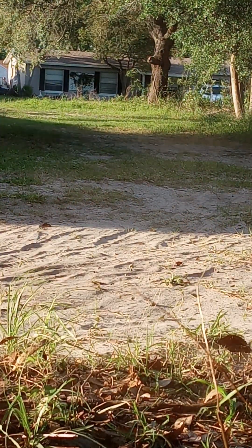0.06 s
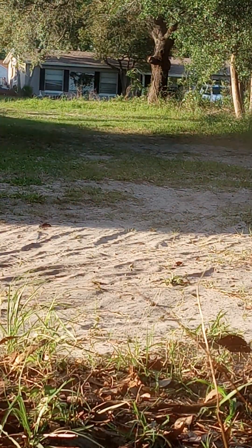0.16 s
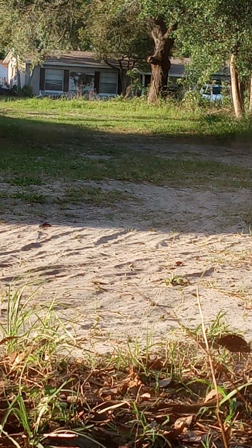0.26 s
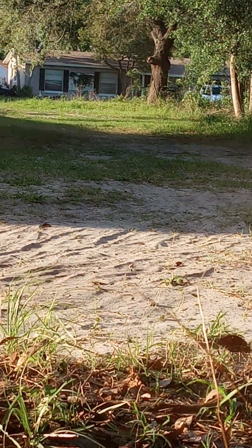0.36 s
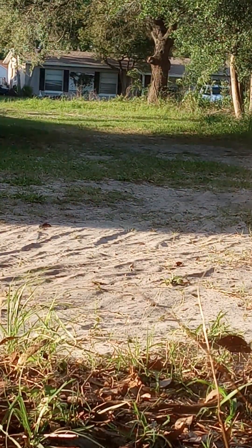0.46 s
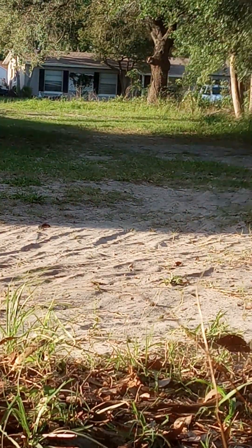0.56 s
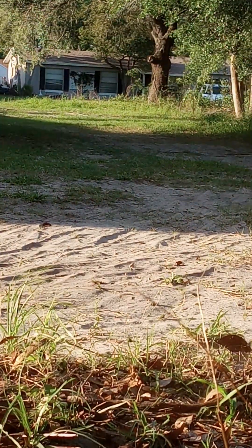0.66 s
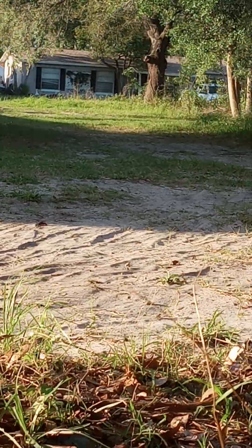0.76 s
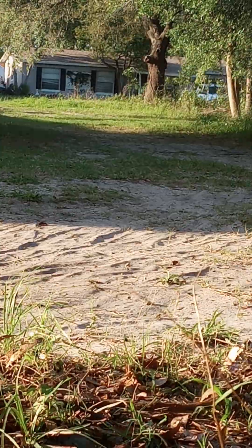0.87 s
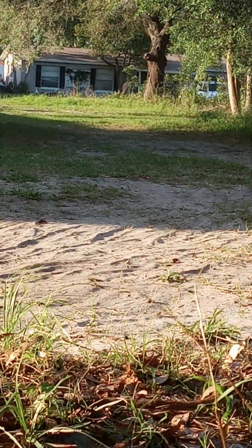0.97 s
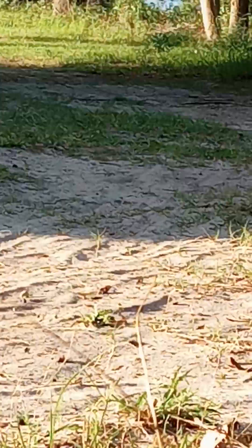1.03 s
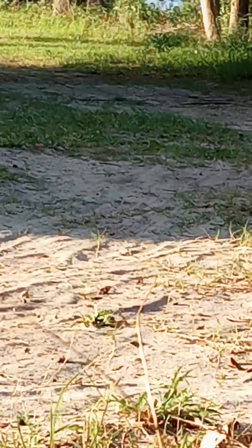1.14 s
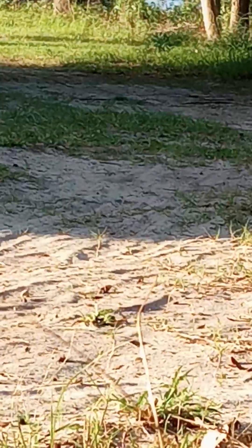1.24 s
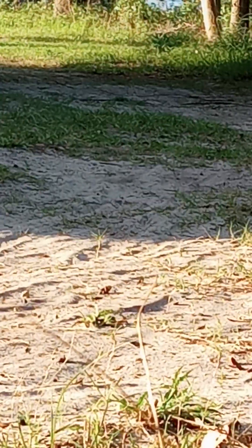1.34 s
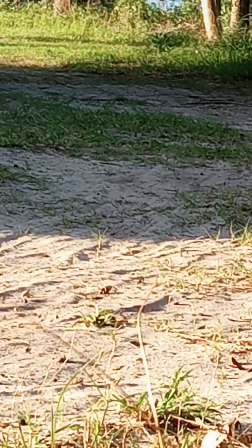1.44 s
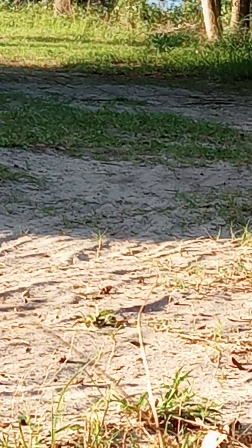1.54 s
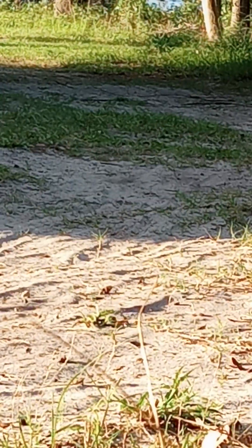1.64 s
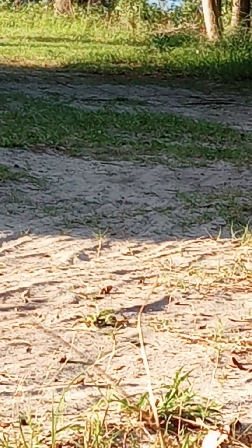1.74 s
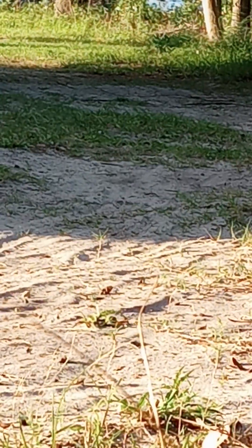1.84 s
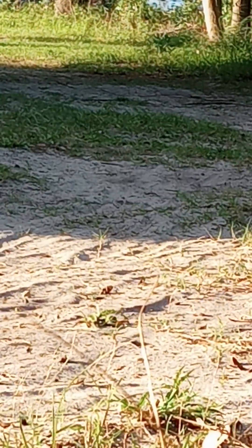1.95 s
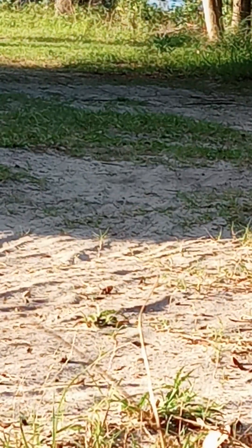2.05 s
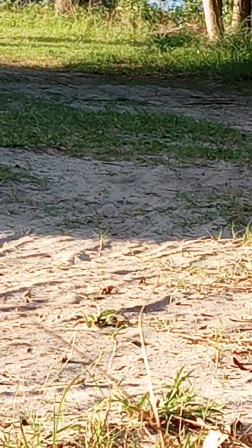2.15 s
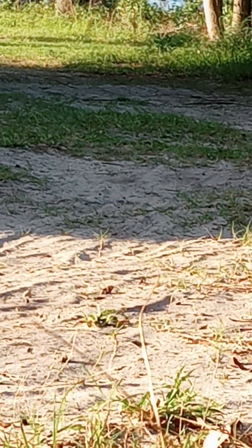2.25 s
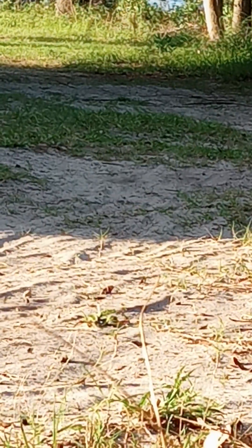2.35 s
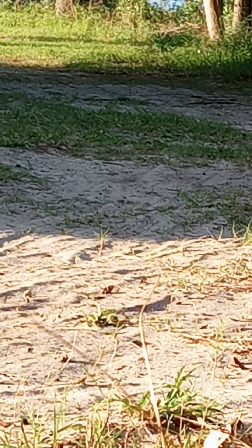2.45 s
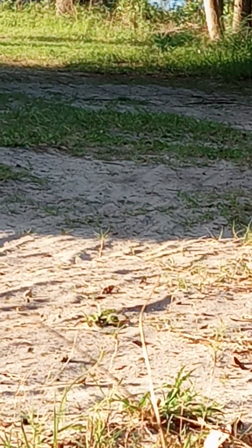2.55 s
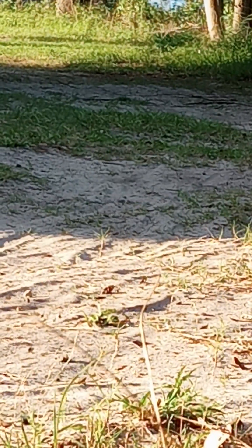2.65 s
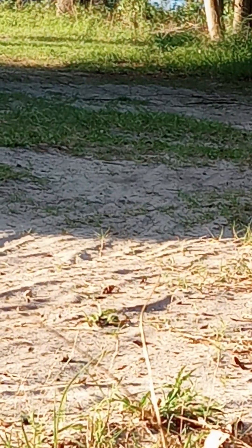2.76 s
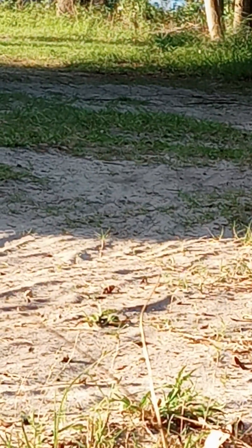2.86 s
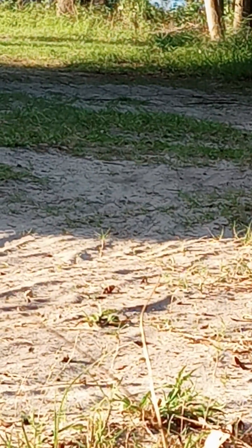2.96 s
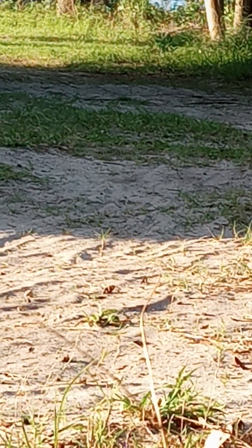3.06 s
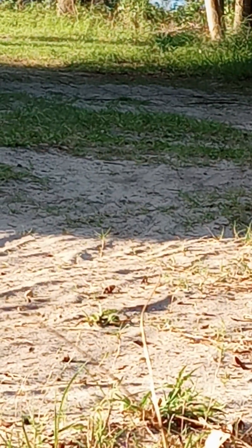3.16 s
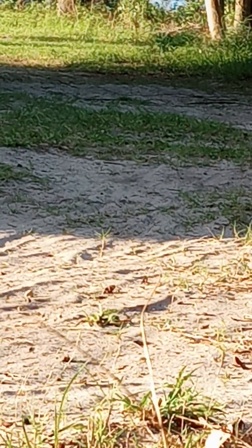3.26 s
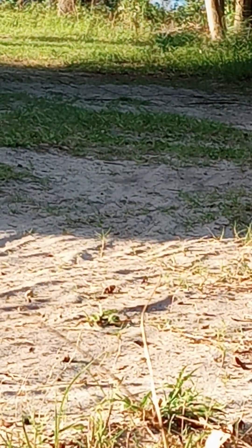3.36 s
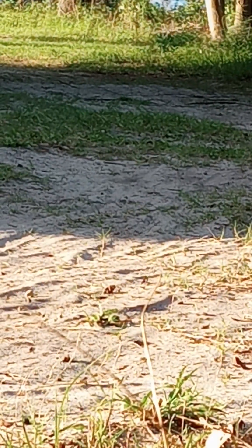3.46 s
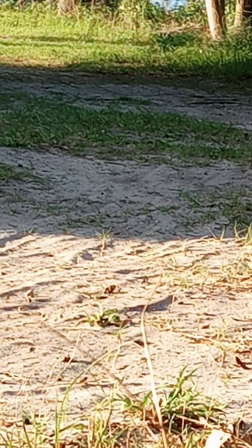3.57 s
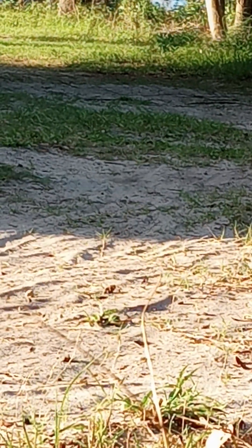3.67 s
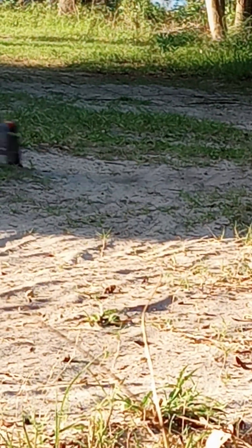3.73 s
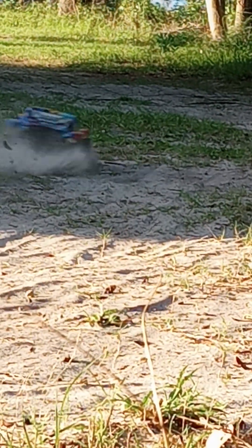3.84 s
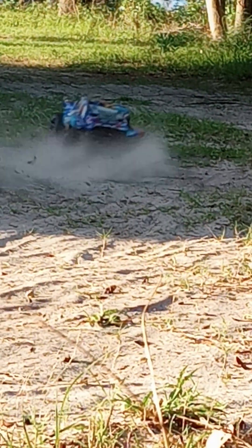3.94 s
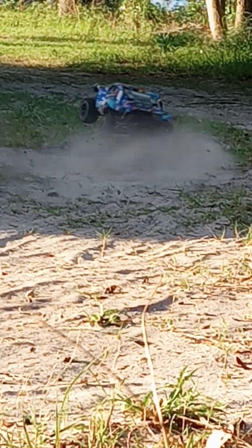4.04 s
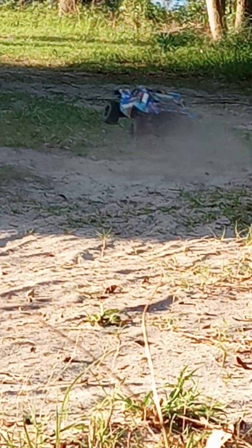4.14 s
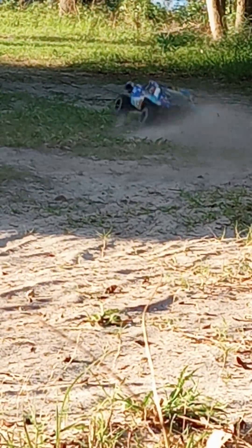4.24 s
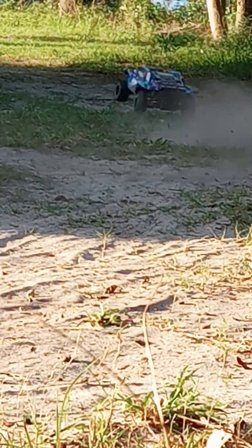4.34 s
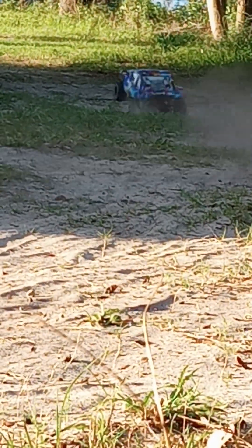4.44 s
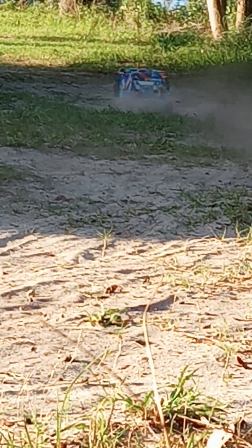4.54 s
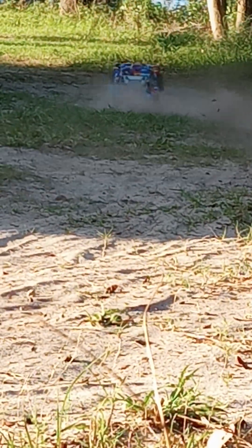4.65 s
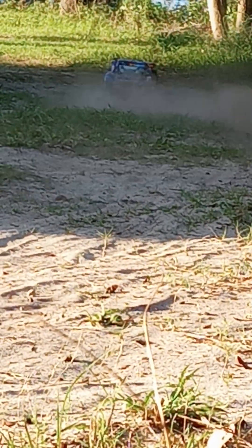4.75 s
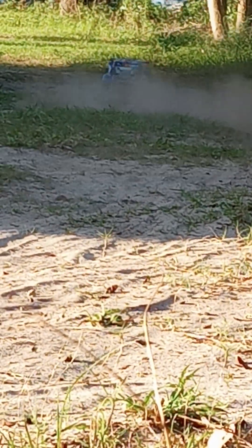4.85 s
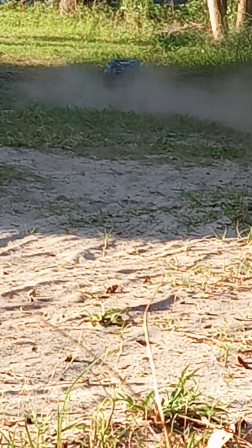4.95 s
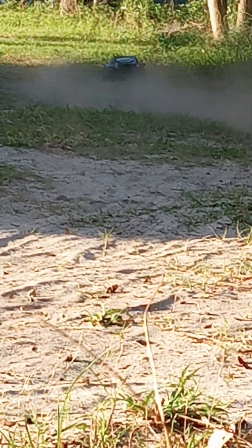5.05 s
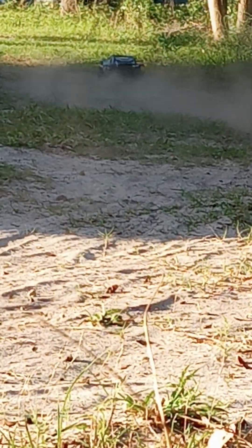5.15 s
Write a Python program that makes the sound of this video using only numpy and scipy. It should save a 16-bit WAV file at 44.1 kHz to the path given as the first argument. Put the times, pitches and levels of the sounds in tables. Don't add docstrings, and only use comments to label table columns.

```python
import sys
import numpy as np
from scipy import signal
from scipy.fft import rfft, irfft
from scipy.io import wavfile
from scipy.ndimage import uniform_filter1d, map_coordinates

SR = 44100
rng = np.random.default_rng(int(sys.argv[2]) if len(sys.argv) > 2 else 0)


def to_wav(s):
    ch = np.atleast_2d(s).T
    pcm = np.round(np.clip(ch, -1, 1) * 32767)
    wavfile.write(sys.argv[1], SR, pcm.astype(np.int16))


def decibels_to_gain(level_db):
    exponent = np.asarray(level_db, float) / 20
    return 10 ** exponent


N = 229408
TIME = np.arange(N) / SR
SIDES = np.array([[.5], [-.5]])
TOP_HZ = 15600
AXLE_RATIO = .395
# [t/s, f/Hz]
FIRST_NOTCH = [(1.45, 3000), (2.1, 2950), (2.4, 2680), (2.75, 2820), (3.25, 2560), (3.55, 3150),
               (3.95, 3050), (4.25, 3050), (4.33, 3400), (4.7, 3550), (4.8, 2800), (4.9, 3200),
               (5.2, 3500)]


def in_time(rows):
    s, *columns = np.transpose(rows)
    return [np.interp(TIME, s, c) for c in columns]


def at_hz(points, hz):
    point_hz, value = np.array(points).T
    return np.interp(np.log(hz), np.log(point_hz), value)


def rms_one(x):
    return x / np.sqrt(np.mean(x ** 2) + 1e-20)


def drift(rate):
    r = np.exp(-64 * np.pi * rate / SR)
    noise = rng.standard_normal(N // 32 + 1002)
    slow = signal.lfilter([1], [1, -2 * r, r * r], noise)[1000:]
    return np.interp(np.arange(N) / 32, np.arange(len(slow)), rms_one(slow))


def resonance(x, hz, width):
    r = np.exp(-np.pi * width / SR)
    zeros = np.array([1, 0, -1]) * (1 - r * r) / 2
    return signal.lfilter(zeros, [1, -2 * r * np.cos(2 * np.pi * hz / SR), r * r], x)


def steep(x, hz, width):
    return resonance(resonance(x, hz, width), hz, width)


def ringing(x, modes, patchy_db):
    out = 0
    for hz, width, db in modes:
        swell_db = patchy_db * np.clip(drift(24.8), -2, 2)
        out = out + decibels_to_gain(db + swell_db) * steep(x, hz, 0.8 * width)
    return out


def treble_share(hz):
    return np.clip(np.log2(hz / 4500) / 1.94, 0, 1)


def grains(per_s, spread_db):
    size_db = spread_db * np.minimum(rng.exponential(1, (2, 2, N)), 4)
    sizes = decibels_to_gain(size_db) * rng.standard_normal((2, 2, N))
    return sizes * (rng.random((2, 1, N)) < per_s / SR) + 1e-9


def banded(source, spectrum, patchy_db, treble_db=0, pan_db=0, order=2):
    # [f/Hz, share 0-1]
    likeness = [(25, .62), (120, .97), (500, .9), (1200, .62), (2500, .87), (5000, .52), (9000, .5),
                (15000, .4)]
    lowest, highest = spectrum[0][0], spectrum[-1][0]
    edges = np.geomspace(lowest, highest, round(2 * np.log2(highest / lowest)) + 1)
    out, power, together = 0, 0, drift(8.3)
    for k, (low, high) in enumerate(zip(edges, edges[1:])):
        band = signal.butter(order, [low, high], "band", fs=SR, output="sos")
        mid, side = signal.sosfilt(band, source[k % 2])
        hz = np.sqrt(low * high)
        alike = np.clip(at_hz(likeness, hz), 0, 1)
        gain = decibels_to_gain(at_hz(spectrum, hz))
        power += np.mean(mid ** 2) * gain ** 2
        flicker_db = patchy_db * (together + drift(17.0))
        moving = decibels_to_gain(flicker_db + treble_share(hz) * (treble_db + pan_db * SIDES))
        stereo = np.sqrt(1 + alike) * mid + np.sqrt(1 - alike) * side * 2 * SIDES
        out = out + gain * moving * stereo
    return out / np.sqrt(2 * power)


def stretches(rows, rise, fall):
    start, length, *levels = np.transpose(rows)[:, :, None]
    t = TIME[::32]
    shape = -rise * np.clip(start - t, 0, None) - fall * np.clip(t - start - length, 0, None)
    curves = []
    for db in levels:
        power = np.sum(10 ** ((db + shape) / 10), axis=0)
        curves.append(np.interp(TIME, t, 10 * np.log10(power + 1e-20)))
    return curves


def gaps(rows, edge):
    return sum(np.clip(-edge * np.minimum(TIME - start, end - TIME), depth_db, 0)
               for start, end, depth_db in rows)


def ticks(events, decay_s, pan_db, broad):
    out, t = np.zeros((2, N + 900)), np.arange(900) / SR
    noises = rng.standard_normal((len(events), 2, len(t)))
    for (s, peak_db, hz), noise in zip(events, noises):
        crack = (noise[0] + 2.7 * noise) * np.exp(-t / decay_s)
        crack[:, 0] = -4.0
        crack = steep(crack, hz, broad * hz) + 2.5 * resonance(crack, hz, .15 * hz)
        at = round(s * SR)
        out[:, at:at + len(t)] += decibels_to_gain(peak_db + pan_db * SIDES) * crack / np.abs(crack).max()
    return out[:, :N]


def yard():
    # [f/Hz, level/dB per Hz]
    yard_spectrum = [(15, -45), (25, -24), (99, 3), (156, -1.5), (400, -14), (1000, -16.5), (3740, -31.5),
                     (5610, -32), (8170, -50), (15600, -37)]
    # [start t/s, length/s, level/dB]
    swells = [(0, 1.04, -62.5), (1.4, 4.7, -67), (.38, 0.073, -60), (.74, 0.046, -58), (1.65, 0.037, -67.5),
              (2.2, 0.059, -66), (2.63, 0.033, -63), (3.12, 0.035, -58.5), (3.7, 0.07, -76),
              (4.5, 0.039, -69), (4.86, 0.41, -60)]
    # (f/Hz, width/Hz, level/dB over the traffic)
    idle_hz, idle_width_hz, idle_db = (119.8, 17.6, 2)
    air = banded(rng.standard_normal((2, 2, N)), yard_spectrum, patchy_db=1.2) * decibels_to_gain(-2.2 * SIDES)
    low = signal.sosfilt(signal.butter(2, 260, fs=SR, output="sos"), air)
    engine = decibels_to_gain(idle_db) * steep(low, idle_hz, idle_width_hz)
    traffic_db = stretches(swells, rise=75, fall=84)[0] + 2.0 * drift(9)
    return decibels_to_gain(traffic_db) * (low + engine) + decibels_to_gain(-67.0) * (air - low)


def leaves():
    # [f/Hz, level/dB per Hz]
    leaf_spectrum = [(880, -48), (1500, -5.5), (2500, -17), (3300, 4.5), (5000, 1.5), (7000, 1.5),
                     (8500, -17.5), (15600, -9)]
    # [start t/s, length/s, level/dB]
    stirs = [
        (.008, 0.042, -60.5),
        (.022, 0.019, -60),
        (.06, 0.051, -54),
        (.124, .012, -60),
        (.14, 0.049, -50),
        (0.247, 0.04, -69.5),
        (0.34, 0.083, -74.5),
        (0.12, 1, -81.5),
        (0.704, 0.039, -74),
    ]
    # [t/s, peak level/dB, f/Hz]
    leaf_snaps = [(0.013, -47, 5200), (0.0244, -57, 10350), (0.0305, -42, 4500), (0.037, -49, 6980),
                  (0.0598, -33, 3900), (0.1008, -33.5, 3840), (0.1385, -30.5, 6200), (0.1412, -35, 5900),
                  (0.1552, -47.5, 4900), (0.179, -40, 5200), (0.2034, -50, 4730), (0.262, -52, 6010),
                  (0.2764, -58, 6040), (0.3444, -56, 6820), (0.3563, -56, 4750), (0.3674, -69, 4300),
                  (0.58, -51, 10600), (0.6235, -58, 5760), (0.739, -58.5, 3120), (1.0795, -54, 10900)]
    rustle = banded(grains(5300, spread_db=3.0), leaf_spectrum, patchy_db=2.0, pan_db=-33.0)
    snaps = .7 * ticks(leaf_snaps, decay_s=.0018, pan_db=-8.0, broad=2.5)
    return decibels_to_gain(stretches(stirs, rise=730, fall=1500)[0] - 9.0) * rustle + snaps


def twig():
    # [t/s, peak level/dB, f/Hz]
    twig_snap = [
        (0.0594, -35, 890),
    ]
    return ticks(twig_snap, decay_s=.0003, pan_db=-2.0, broad=.35)


def motor_hz():
    # [t/s, mesh f/Hz]
    pulls = [
        [(1.572, 2150), (1.6, 3100), (1.625, 3600), (1.65, 3420), (1.68, 3000), (1.744, 2750), (1.798, 2063)],
        [(1.836, 2485), (1.878, 3400), (1.95, 3520)],
        [(2.06, 1842), (2.098, 2650), (2.13, 2520), (2.182, 2800), (2.2, 2620), (2.232, 2560), (2.258, 2700),
         (2.28, 3060), (2.31, 3170)],
        [(2.338, 3050), (2.36, 3250), (2.44, 4600), (2.472, 4720), (2.51, 4050), (2.54, 4370), (2.59, 4340)],
        [(2.632, 3070), (2.71, 5100), (2.748, 5500), (2.8, 4850), (2.9, 3669), (2.958, 4760), (2.988, 4740),
         (3.005, 4280), (3.04, 3980)],
        [(3.075, 3920), (3.1, 4200), (3.14, 4500), (3.168, 5020), (3.19, 5150), (3.215, 4850), (3.25, 3950)],
        [(3.57, 3424), (3.636, 5426), (3.655, 5913), (3.72, 4252), (3.775, 6020), (3.92, 5937)],
        [(3.97, 3434), (4.11, 3674), (4.125, 4850), (4.17, 5650), (4.215, 6200), (4.32, 6358)],
        [(4.378, 2900), (4.41, 4950), (4.455, 6826), (4.5, 7700), (4.55, 8130), (4.605, 8610), (4.64, 7950),
         (4.676, 5340), (4.75, 4870)],
        [(4.82, 3625), (4.87, 5100), (4.92, 7190), (4.945, 7720), (4.98, 7750), (5.03, 7520)],
    ]
    return uniform_filter1d(in_time(np.concatenate(pulls))[0], size=900)


def drive_levels(hz):
    # [start t/s, length/s, rattle level/dB, whine over rattle/dB]
    load = [(1.477, 0.071, -58, -19), (1.574, 0.07, -48, -12), (1.655, 0.067, -46.5, -18),
            (1.733, 0.13, -46.5, -40), (1.822, 0.098, -45.5, -16), (1.96, 0.077, -54, -20),
            (2.073, 0.052, -52, -7), (2.075, 0.27, -45.5, -15.5), (2.37, 0.11, -43, -3),
            (2.501, 0.11, -37, -20.5), (2.65, 0.18, -35.5, -12), (2.838, 0.23, -35, -11),
            (3.096, 0.13, -35.5, -9), (3.282, 0.02, -44, -38), (3.384, 0.19, -56, -43),
            (3.542, 0.027, -47.5, -27), (3.589, 0.078, -42, -8.5), (3.67, 0.089, -47.5, -39),
            (3.784, 0.072, -39.5, -20), (3.88, 0.061, -45, -27), (4.015, 0.15, -43.5, -15.5),
            (4.158, 0.047, -43, -4), (4.21, 0.072, -57, -5), (4.301, 0.068, -45, -9),
            (4.412, 0.072, -43.5, -6), (4.501, 0.098, -45.5, -9), (4.617, .035, -48, -17),
            (4.644, 0.053, -48.5, -15), (4.718, 0.1, -49.5, -11.5), (4.861, 0.053, -51, -1.5),
            (4.919, 0.062, -49.5, -11), (5.012, 0.062, -60.5, -35), (5.171, 0.032, -56, -27)]
    rise = 386
    rattle_db, = stretches([row[:3] for row in load], rise, fall=266)
    gear_rows = [(s, length, db + over) for s, length, db, over in load]
    gears_db, = stretches(gear_rows, rise, fall=380)
    judder_db = 0.5 * drift(41)
    octaves_per_s = uniform_filter1d(np.gradient(np.log2(hz)) * SR, size=600)
    return rattle_db + judder_db, gears_db + judder_db, np.tanh(octaves_per_s / 11.0)


def whine(hz, axle_db, mesh_db, second_db, pan_db):
    # [t/s, share of noise band 0-1]
    wheelspin = [(1.5, .5), (1.7, .55), (2.0, .7), (2.1, .3), (2.85, .3), (3.25, .33), (3.55, .7),
                 (3.7, .9), (4.26, .88), (4.45, .75), (4.6, .65), (4.7, .9), (4.83, .75), (4.9, .9),
                 (5.1, .75)]
    # [t/s, phase/rad per turn]
    out_of_true = [
        (1.5, .2),
        (2.75, .15),
        (2.95, .5),
        (3.25, .6),
        (5.1, .3),
    ]
    pinion_teeth, spur_teeth = 26, 54.0
    third_db, breakup_db = -11.5, 9.0
    front_ratio, front_db, front_start_hz, front_fade_hz = .83, -2.5, 3250, 3900
    slip = 1 + .013 * drift(24)
    cycles = np.cumsum(hz * slip) / SR
    spur_turn = 2 * np.pi * cycles / spur_teeth
    throb = 1 + .5 * np.sin(2 * np.pi * cycles / pinion_teeth + drift(30))
    throb *= 1 + .4 * np.sin(spur_turn + drift(8))
    loose, out = in_time(wheelspin)[0], 0
    wobble = in_time(out_of_true)[0] * np.sin(spur_turn)
    coasting_db = np.clip(-np.gradient(hz) * SR / 500, 0, 15)
    front_loss_db = 10 * np.log10(1 + (hz / front_fade_hz) ** 8 + (front_start_hz / hz) ** 20)
    gear_lines = [(AXLE_RATIO, axle_db), (1, mesh_db), (2, second_db), (3, second_db + third_db),
                  (front_ratio, mesh_db + front_db - front_loss_db - coasting_db)]
    for multiple, level_db in gear_lines:
        spin = loose * min(multiple, 1) ** (3 - 3 * loose)
        smear = .6 * np.sqrt(multiple) * drift(80) + (multiple ** 2 - .75) * wobble
        phase = 2 * np.pi * multiple * cycles + smear + .7 * SIDES * drift(40)
        low_pass = signal.butter(2, 360 * multiple ** .6, fs=SR, output="sos")
        wide = signal.sosfilt(low_pass, rng.standard_normal((2, N)))
        a, b = spin * rms_one(wide) / np.sqrt(2)
        clean = np.sqrt(1 - spin ** 2) * throb * decibels_to_gain(1.8 * drift(40))
        audible = np.clip((TOP_HZ - multiple * hz) / 300, 0, 1)
        grip_loss = spin ** (3 / max(multiple, 1) ** 1.1)
        broken_db = breakup_db * grip_loss * np.clip(drift(34), -3, 1)
        side_db = treble_share(multiple * hz) * pan_db * SIDES
        level = 0.99 * audible * decibels_to_gain(level_db + broken_db + side_db)
        out = out + level * ((clean + a) * np.sin(phase) + b * np.cos(phase))
    return out


def gearbox(rattle_db, treble_db, pan_db):
    # [f/Hz, level/dB per Hz]
    rattle_spectrum = [(1100, 6.5), (1500, -22), (2300, 1), (3000, 10), (4200, 0.5), (6400, 0),
                       (8500, -0.5), (11000, -13), (13500, -4.5), (15800, -10)]
    # [f/Hz, width/Hz, level/dB over the rattle]
    chassis = [(2210, 90, 2), (3050, 130, 0), (3650, 130, 2), (4450, 140, 1), (5900, 240, 2),
               (6650, 170, 2), (7800, 180, 1), (8800, 220, 3), (9500, 240, 2), (10300, 240, 1),
               (11200, 450, 0), (12500, 320, -1)]
    rattle = banded(grains(16000, spread_db=0.6), rattle_spectrum, patchy_db=1.5,
                    treble_db=treble_db + 5.0, pan_db=1.04 * pan_db)
    modes = ringing(rattle, chassis, patchy_db=6.5)
    swerve_s = TIME + .00015 * drift(5)
    modes = np.array([np.interp(swerve_s, TIME, c) for c in modes])
    return decibels_to_gain(rattle_db - 9.5) * (rattle + decibels_to_gain(0.5) * modes)


def with_late_copy(x):
    late = np.arange(N) - SR / 2 / in_time(FIRST_NOTCH)[0]
    dull = uniform_filter1d(x, size=5, axis=1)
    return x + .8 * np.array([map_coordinates(c, [late], order=1) for c in dull])


def tyres():
    # [start t/s, length/s, low thump level/dB, side panel level/dB]
    contact = [(1.506, 0.087, -77, -54.5), (1.46, 0.045, -73, -60), (1.62, 0.36, -63, -66),
               (1.88, 0.067, -56, -59.5), (2.05, 0.089, -65, -61.5), (2.17, 0.14, -68.5, -86),
               (2.3, 0.047, -67, -59.5), (2.4, 0.29, -58, -57.5), (2.72, 0.16, -56.5, -54),
               (2.88, 0.1, -63.5, -56.5), (2.99, 0.17, -53, -54), (3.2, 0.11, -52.5, -52),
               (3.35, 0.051, -52, -60), (3.41, 0.095, -55, -73), (3.56, .08, -90, -104),
               (3.68, 0.05, -54, -62), (3.77, 0.19, -60.5, -72.5), (4.02, 0.18, -63, -68),
               (4.32, 0.057, -52, -52.5), (4.42, 0.15, -68.5, -77), (4.63, 0.062, -46.5, -49),
               (4.71, 0.17, -61, -79), (4.99, 0.016, -48.5, -58), (5.04, 0.21, -71, -74)]
    # [f/Hz, width/Hz, level/dB]
    thump = [(328.3, 183, -4.5), (403, 74, -4), (478.6, 45, -2.5), (580, 58, -5.5)]
    # [f/Hz, width/Hz, level/dB]
    panel = [(697.6, 150, 11), (771, 127, 7.5)]
    # [f/Hz, width/Hz, level/dB]
    scrabble = [(888, 270, 9.5), (1265, 530, -4), (1228, 170, 1.5), (1690, 90, -4)]
    mid, side = grains(900, spread_db=-0.5)[0]
    blows = mid + 0.24 * side * 2 * SIDES
    thump_db, panel_db = stretches(contact, rise=590, fall=390)
    scrabble_db = (thump_db + panel_db) / 2 - 3.5
    out = 0
    for level_db, modes in ((thump_db, thump), (panel_db, panel), (scrabble_db, scrabble)):
        hz = modes[1][0]
        group = ringing(blows, modes, patchy_db=4.0) + 0.07 * resonance(blows, hz, 3.5 * hz)
        out = out + decibels_to_gain(level_db - 5.0) * rms_one(group)
    return out


def buzzes(pan_db):
    # [start t/s, length/s, f/Hz, level/dB]
    loose_parts = [(1.509, 0.037, 766, -59), (1.824, 0.017, 4480, -61.5), (1.851, 0.024, 4660, -63),
                   (2.012, 0.013, 723, -64.5), (1.828, 0.02, 2430, -57.5), (1.86, 0.027, 6640, -59),
                   (2.429, 0.062, 11400, -59), (2.542, 0.077, 10940, -52.5), (2.55, 0.051, 2160, -58),
                   (2.82, 0.042, 11150, -52.5), (2.835, 0.047, 6420, -50), (3.101, 0.053, 2215, -52),
                   (3.107, 0.063, 6720, -50.5), (3.109, 0.037, 11070, -47.5), (3.218, 0.023, 2217, -51),
                   (3.566, 0.081, 10600, -51.5), (3.602, 0.039, 2080, -61.5), (3.757, 0.17, 5950, -63),
                   (3.787, 0.12, 3650, -58), (3.809, .075, 2116, -63.5), (3.821, 0.054, 9360, -51),
                   (4.044, 0.089, 3820, -58), (4.05, 0.04, 2880, -54), (4.09, 0.026, 3094, -52.5),
                   (2.897, 0.064, 11000, -50), (3.019, 0.11, 12400, -55.5), (3.127, 0.084, 11460, -48),
                   (4.371, 0.018, 3620, -57), (4.39, 0.015, 3090, -60), (4.254, 0.075, 5920, -65),
                   (4.425, 0.033, 6060, -49.5), (4.462, 0.14, 6010, -57), (1.767, .055, 718, -63),
                   (4.055, 0.065, 1320, -63), (4.702, 0.083, 4910, -63), (5.165, 0.05, 3630, -69.5)]
    out, throb = np.zeros((2, N + SR)), decibels_to_gain(3.5 * drift(50))
    noises = rng.standard_normal((len(loose_parts), 2, 9000))
    for (s, length, hz, db), noise in zip(loose_parts, noises):
        at = round((s - .01) * SR)
        n = min(round((length + .02) * SR), 9000)
        ring = steep(noise[0] + .35 * noise, hz, .045 * hz)[:, -n:]
        level = decibels_to_gain(db + treble_share(hz) * pan_db[at] * SIDES)
        out[:, at:at + n] += level * rms_one(ring) * signal.windows.tukey(n, .5)
    return out[:, :N] * throb


def moving_notches(x):
    # [multiple of first notch pitch, half width/Hz, mean share]
    notches = [(1, 110, 1.3), (1.25, 80, .5), (2.9, 170, .6)]
    for multiple, width, share in notches:
        turn = np.exp(2j * np.pi * multiple * np.cumsum(in_time(FIRST_NOTCH)[0]) / SR)
        r = np.exp(-2 * np.pi * width / SR)
        depth = np.clip(share + .6 * drift(4), 0, 1)
        x = x - 2 * depth * np.real(turn * signal.lfilter([1 - r], [1, -r], x / turn))
    return x


def grit():
    # [t/s, peak level/dB, f/Hz]
    grit_hits = [(2.0205, -48, 3670), (2.0465, -33.5, 4820), (3.4296, -48, 6900), (3.482, -46, 6240),
                 (3.534, -43, 5600), (3.556, -41, 5700), (3.687, -32, 6500), (3.7195, -41, 5840),
                 (3.7454, -43, 6140), (3.7915, -30, 7800), (3.9174, -36, 3930), (3.941, -40, 3650),
                 (3.9772, -39, 3500), (3.9957, -46, 6050), (4.016, -44, 6150), (4.2747, -35, 6200)]
    return .58 * ticks(grit_hits, decay_s=.004, pan_db=-5.0, broad=2.5)


def bites():
    # [t/s, lift/dB]
    hops = [(2.807, 2), (2.856, 2), (2.954, 3.5), (3.098, 3), (3.251, 11.5), (3.56, 3.5), (3.595, -1),
            (3.621, 6), (3.637, 4.5), (3.652, 3.5), (3.767, 8), (3.863, 2.5), (3.882, 5), (3.901, 7),
            (4.133, 7), (4.17, 3), (4.203, -2), (4.245, 9.5)]
    # [start t/s, end t/s, depth/dB]
    lift_offs = [
        (3.255, 3.31, -0.5),
        (3.656, 3.685, -9),
        (3.7, 3.712, -5),
        (3.73, 3.742, -5),
        (3.925, 3.936, -10),
    ]
    half_s = .0035
    t = TIME[::32]
    lift_db = sum(db * np.exp(-((t - s) / half_s) ** 2) for s, db in hops)
    return np.interp(TIME, t, lift_db) + gaps(lift_offs, edge=1300)


def knocks():
    # [t/s, peak level/dB, f/Hz]
    chassis_knocks = [
        (3.274, -41, 515),
        (3.354, -42, 450),
        (4.343, -41, 500),
        (4.635, -40, 600),
        (4.66, -42, 400),
        (4.9938, -36, 800),
        (4.9958, -42, 400),
    ]
    return ticks(chassis_knocks, decay_s=.0007, pan_db=-.5, broad=2.2)


def scene():
    # [t/s, left minus right treble/dB, treble level/dB, axle over mesh/dB, 2nd overtone over mesh/dB]
    heading = [(1.45, -5.5, -30, -12, -10), (1.6, -32.5, -4, -15, 3), (1.75, -28, -5, -20, 0),
               (2.0, -25, -6.5, -24, -4), (2.2, -23.5, 4.5, 1.5, 7.5), (2.42, -16, -2, -20, -4),
               (2.55, -15.5, -2.5, -12, 3), (2.72, -16, -2, -19, 1), (2.9, -16, -1, -19, -3),
               (3.04, -15, -2, -9, -3), (3.13, -13.5, -2, -10, -4), (3.19, -13.5, -1, -12, 2),
               (3.6, -13.5, -1.5, -18, 3), (4.05, -5.5, -2, -20, -8), (4.17, -5, 0, -10, -5),
               (4.24, -4, 2, -13, -3), (4.3, -4, 0, -2, -12), (4.33, -4, -1, -3, -15),
               (4.37, -5, -2.5, -5.5, -20), (4.47, -2, 4, -3, -17), (4.54, -2, 4, -6, -17),
               (4.6, -4, 2, -3, -17), (4.665, -8, -4, 1, -18), (4.7, -10, -7.5, -10.5, -18),
               (4.85, -9, -6, -9, -20), (4.95, -8, -5, -1, -21), (5.2, -8, -5, -6, -21)]
    axle_overrun_db, axle_cut_hz = 5.5, 1360
    pan_db, facing_db, axle_db, second_db = in_time(heading)
    hz = motor_hz()
    rattle_db, gears_db, gaining = drive_levels(hz)
    axle_loss_db = 10 * np.log10(1 + (axle_cut_hz / AXLE_RATIO / hz) ** 8)
    axle_db = axle_db + gears_db - axle_overrun_db * gaining - axle_loss_db
    lines = whine(hz, axle_db, gears_db, gears_db + second_db, pan_db)
    echo = decibels_to_gain(-14) * np.roll(lines, round(.024 * SR), axis=1)
    treble_db = facing_db + 7 * np.log2(hz / 4500) + 0.28 * np.maximum(rattle_db + 42.0, -15)
    rattle = with_late_copy(gearbox(rattle_db, treble_db, pan_db)) * decibels_to_gain(-1.0)
    drive = decibels_to_gain(bites()) * (lines + buzzes(pan_db) + rattle) + echo
    return moving_notches(drive + tyres()) + grit() + knocks() + twig() + leaves() + yard()


def thin_bands(x):
    # [start t/s, length/s, f/Hz, half width/Hz]
    missing = [(1.96, .06, 9000, 150), (2.12, .13, 8750, 200), (2.15, .1, 3450, 80), (2.37, .11, 2700, 110),
               (2.51, .12, 2740, 100), (2.56, .045, 3280, 80), (2.66, .14, 2760, 80),
               (2.925, .09, 3320, 80), (2.98, .07, 2740, 100), (3.06, .1, 2650, 100), (3.15, .11, 2550, 90),
               (3.17, .04, 3850, 90), (3.2, .055, 2800, 80), (3.57, .1, 3130, 90), (3.58, .07, 2650, 70),
               (3.6, .06, 1350, 120), (3.81, .1, 3080, 100), (3.97, .14, 4080, 80), (4.09, .02, 4300, 200),
               (4.16, .045, 3330, 110), (4.23, .04, 4100, 170), (4.23, .04, 3050, 120),
               (4.27, .07, 3430, 70), (4.44, .04, 3120, 120), (4.49, .075, 3420, 100),
               (4.49, .05, 4080, 90), (4.51, .12, 2600, 80), (4.55, .06, 2330, 120), (4.25, .08, 8900, 150),
               (4.4, .03, 8700, 200), (4.51, .05, 8750, 200), (4.65, .03, 9000, 200),
               (4.7, .075, 7450, 170), (4.83, .04, 7450, 130), (.108, .014, 9500, 1800),
               (.11, .01, 4500, 500)]
    out, edge_s = x.copy(), .016
    for s, length, hz, width in missing:
        at, n = round((s - edge_s / 2) * SR), round((length + edge_s) * SR)
        window = signal.windows.tukey(n, edge_s / (length + edge_s))
        off_hz = np.abs(np.arange(n // 2 + 1) * SR / n - hz)
        inside = np.clip((width + 40 - off_hz) / 80, 0, 1)
        out[:, at:at + n] -= .95 * window * irfft(rfft(out[:, at:at + n]) * inside, n)
    return out


def band_limit(x):
    return signal.sosfilt(signal.butter(12, 16760, fs=SR, output="sos"), x)


def record(dry):
    # (f/Hz, width/Hz, lift/dB)
    port_hz, port_width_hz, port_db = (15250, 550, 10)
    # [start t/s, end t/s, depth/dB]
    dropouts = [
        (0.807, 0.845, -37.5),
        (1.087, 1.445, -125),
    ]
    bright = dry + (decibels_to_gain(port_db) - 1) * resonance(dry, port_hz, port_width_hz)
    top_cut = signal.ellip(10, .5, 70, TOP_HZ, fs=SR, output="sos")
    cut = signal.sosfilt(top_cut, bright)
    mix = thin_bands(cut) * decibels_to_gain(4 + gaps(dropouts, edge=5900))
    return band_limit(mix)


dry = scene()
out = record(dry)
to_wav(out)
```